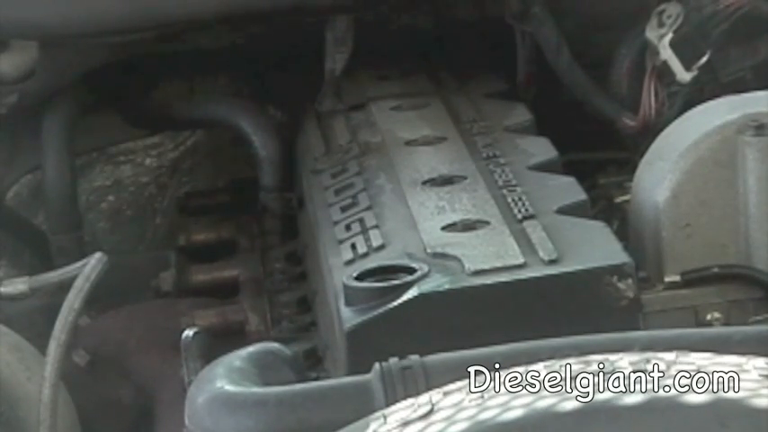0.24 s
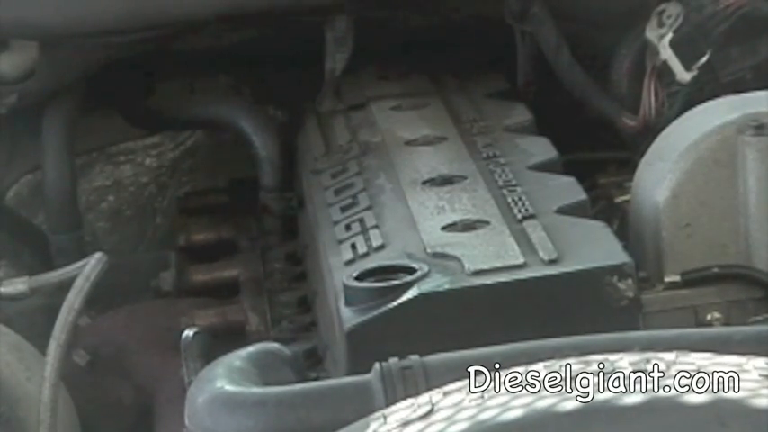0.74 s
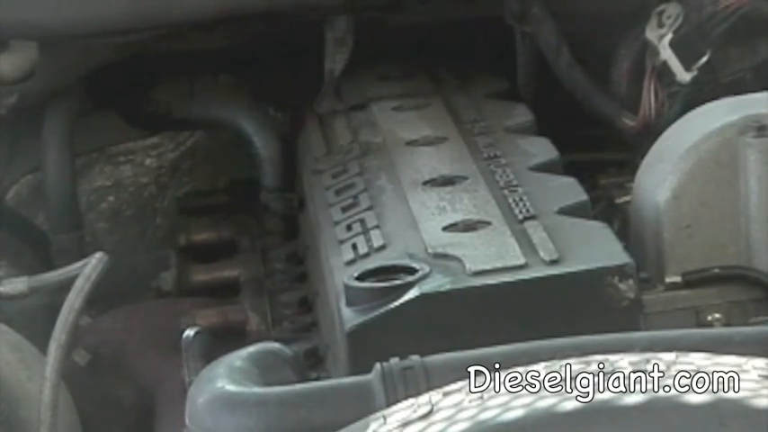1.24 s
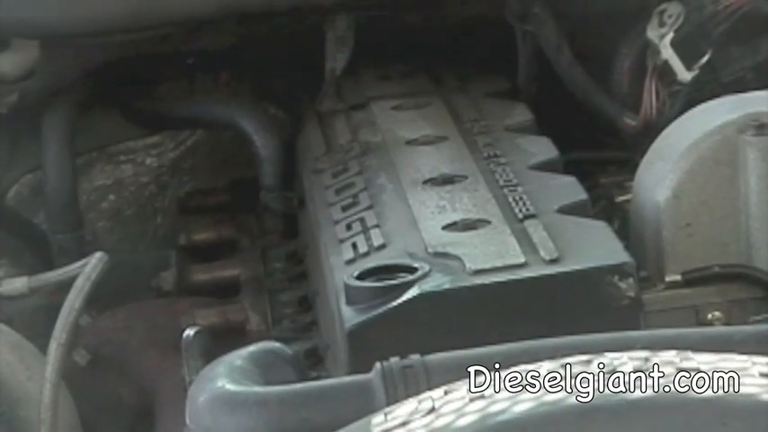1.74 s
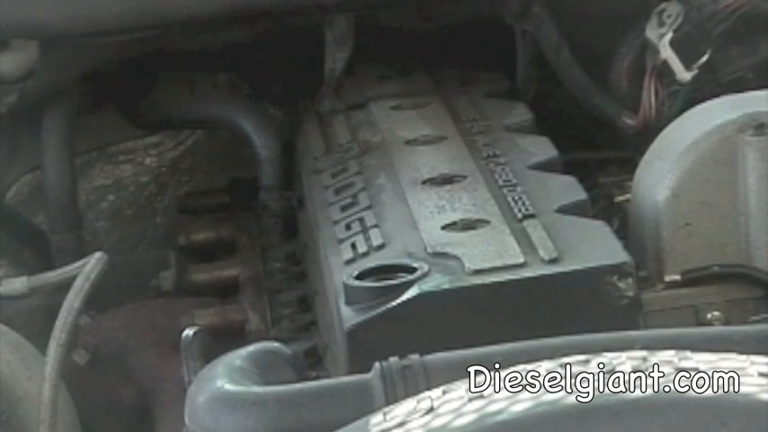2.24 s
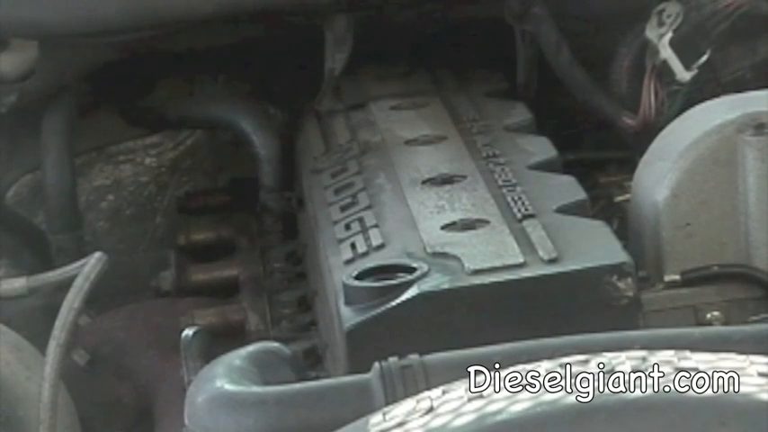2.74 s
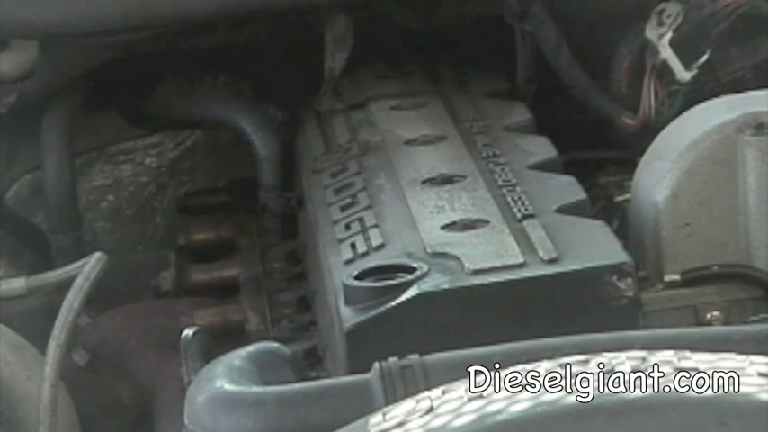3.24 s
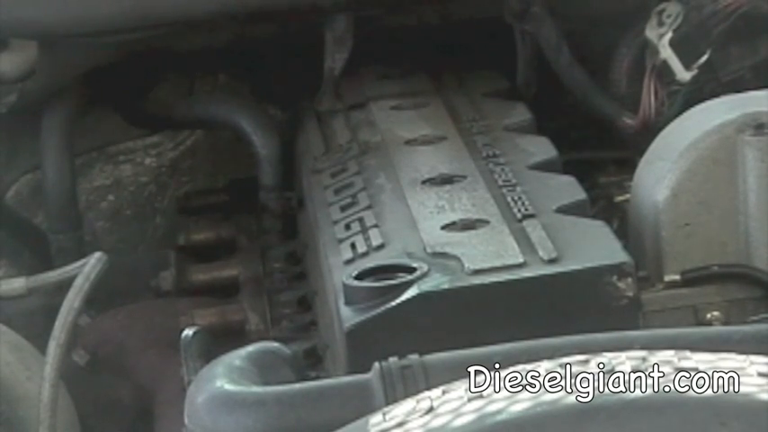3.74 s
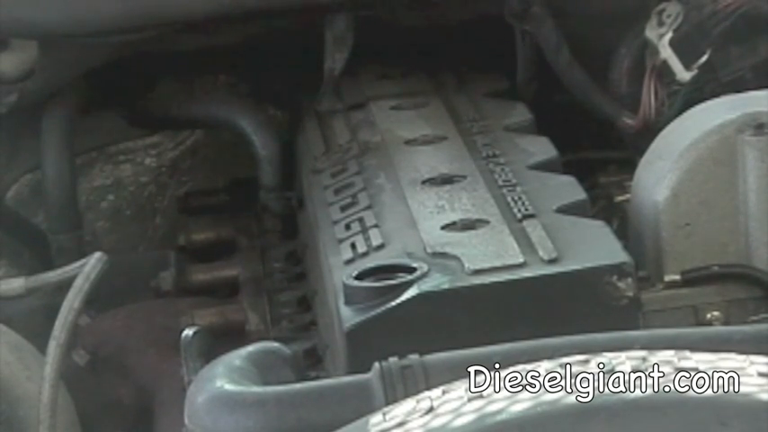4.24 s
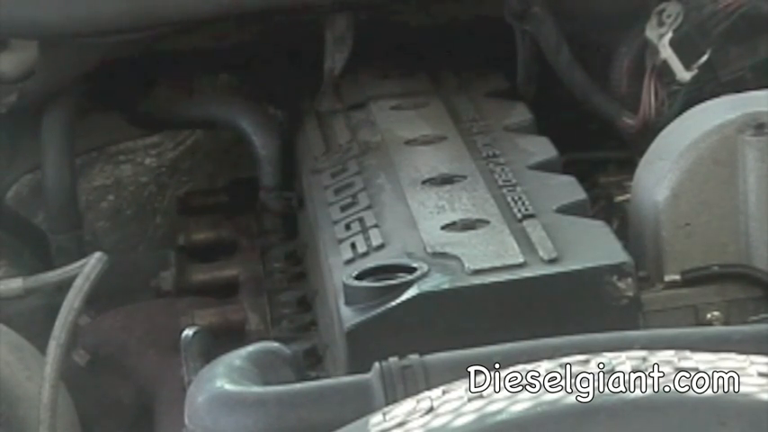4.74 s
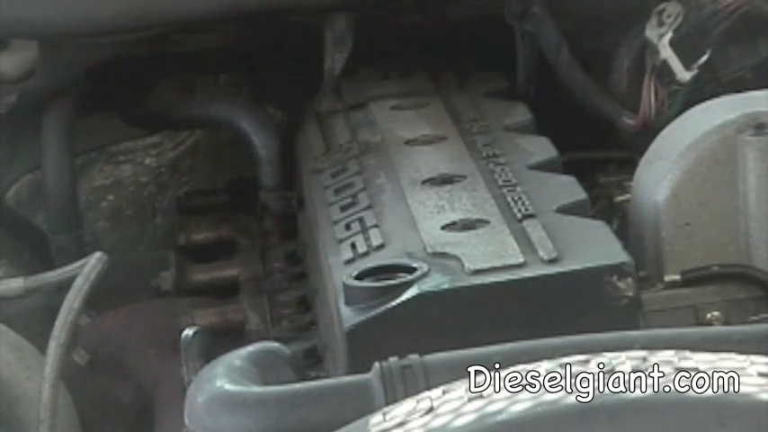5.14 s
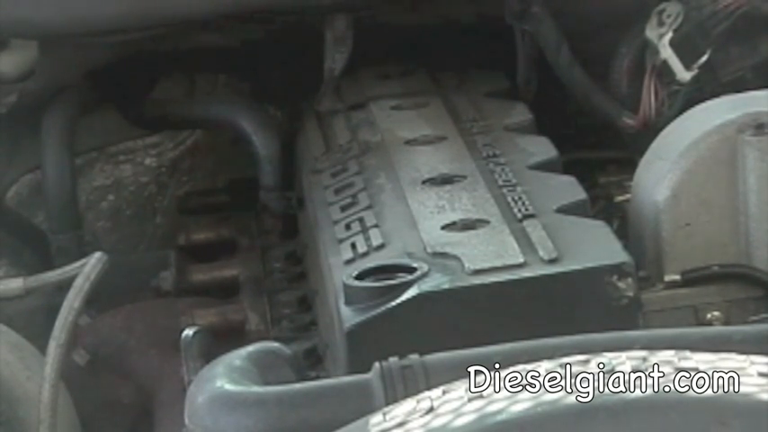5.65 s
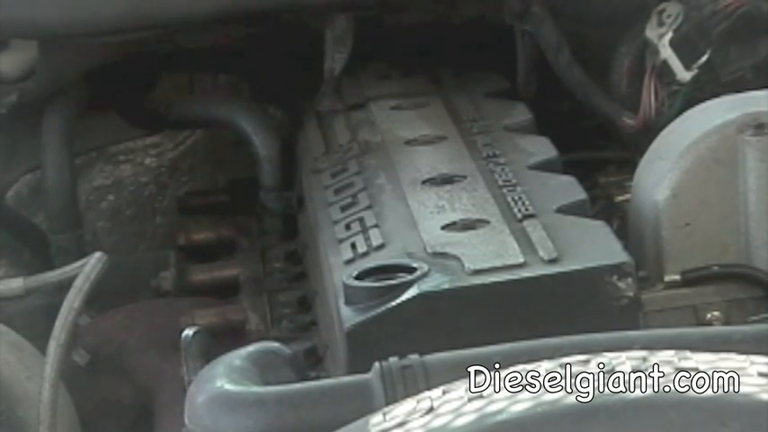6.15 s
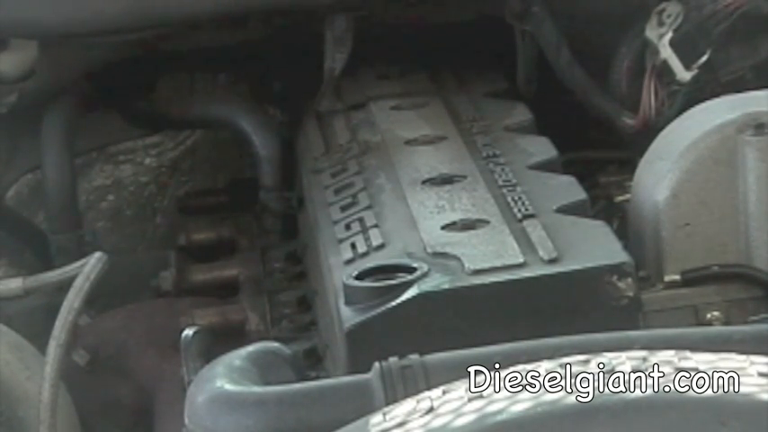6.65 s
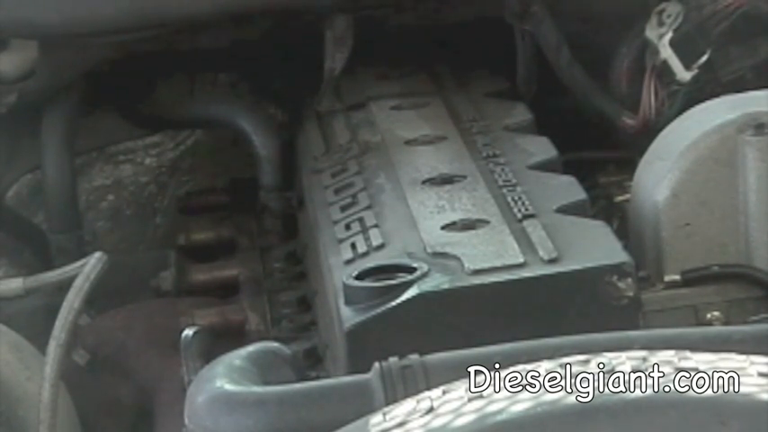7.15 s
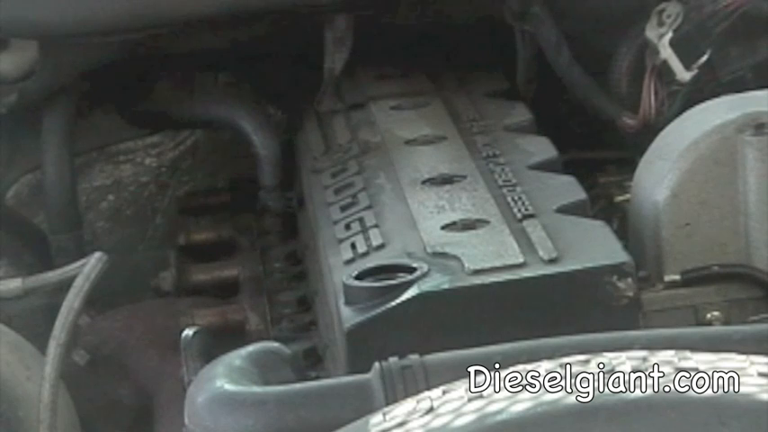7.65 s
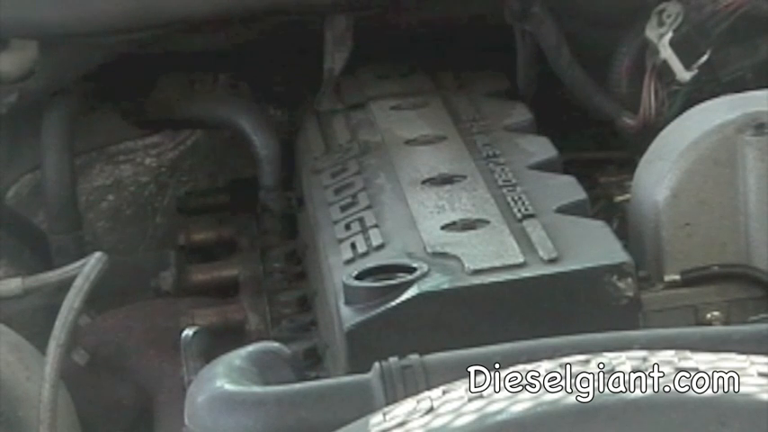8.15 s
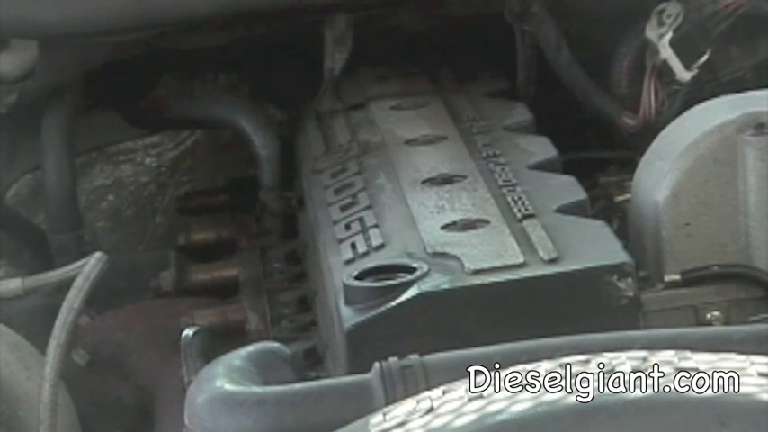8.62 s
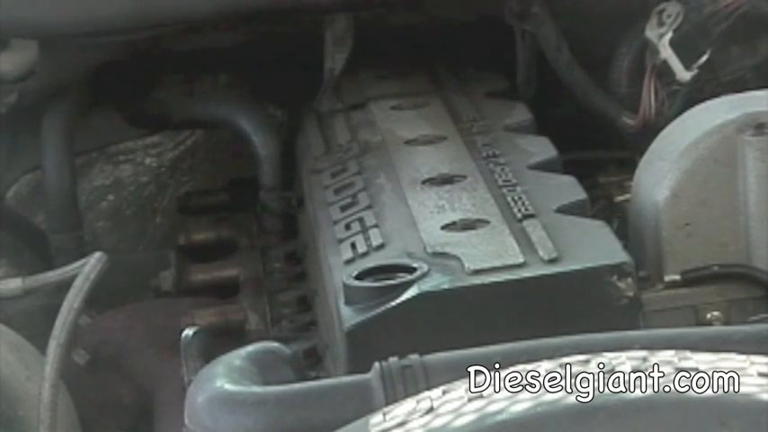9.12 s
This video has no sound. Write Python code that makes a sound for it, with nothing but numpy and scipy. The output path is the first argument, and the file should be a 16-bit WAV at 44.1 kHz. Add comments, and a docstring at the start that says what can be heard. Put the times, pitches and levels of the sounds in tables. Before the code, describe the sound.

Close up, a starter clunks and screeches, and a large diesel engine catches and settles into an even, rattling idle.

```python
"""A six-cylinder turbo diesel starts and idles under the open hood of a parked truck, heard close up.
After a few soft clicks the starter slams in and screeches for half a second; the engine catches,
revs up briefly and settles. Every firing knocks, slaps and rings the metal block, and each cylinder
knocks with its own strength. Injectors rattle, valves tap, the exhaust hums, the fan drones and
the belt chirps once a turn. A faint outdoor rumble lies behind it all."""
import sys
import numpy as np
from scipy import signal
from scipy.fft import rfft, irfft, next_fast_len
from scipy.io import wavfile
from scipy.ndimage import uniform_filter1d, minimum_filter1d, map_coordinates

SR = 44100
rng = np.random.default_rng(int(sys.argv[2]) if len(sys.argv) > 2 else 0)


def wrap_up_sound(samples):
    """Save the sound to the file named by the first command line argument, as 16-bit audio."""
    columns = np.atleast_2d(samples).T
    # keep every value between -1 and 1, then stretch to whole-number steps
    tamed = np.clip(columns, -1, 1)
    steps = np.round(tamed * 32767).astype(np.int16)
    wavfile.write(sys.argv[1], SR, steps)


N = 413658
CATCH_S = 1.3  # when the engine starts to run

# how fast the engine runs: (time [s], speed [firings/s])
ENGINE_SPEED = [(1.3, 25.21), (1.5, 55.31), (1.68, 55.48), (1.9, 44.95), (2.3, 39.81), (3.2, 40.33),
                (3.9, 39.83), (5.2, 40.13), (7.5, 40.06), (8.8, 40.51)]
# hard at first, soft while the fuel is cut back, then idle: (time [s], blows [dB], rattle [dB])
FUEL = [(1.38, -1, -4), (1.52, -3, -5.5), (1.85, -7.5, -4), (2.2, -1, -1.5), (3.8, 0, 0.4),
        (5.7, -0.5, 1.5), (9.3, -0.2, .2)]
# the cylinders in firing order: (knock [dB], injector [dB], valve tap [dB])
CYLINDERS = [(0, 0.5, 1), (1.5, 0.4, 0.5), (-4, -0.9, -1.5), (2, 0, 2), (-3, 0.4, 1.5), (2.5, 0.3, -0.5)]
# ringing of the block and covers, plus two faint peaks at the fan's drone pitches (580 and 730 Hz):
# (pitch [Hz], width [Hz], boost [dB])
ENGINE_PEAKS = [(193, 50, 5.5), (234, 77, 4.5), (580, 16, 1), (730, 29, 2.5), (805.6, 27, 10.5),
                (976, 89, 6.5), (1134, 98, 9.5), (1325, 131, 9.5), (1420, 62, 10.5), (1619, 130, 8),
                (1834, 17, 7.5), (1937, 92, 7.5), (2202, 69, 6), (2402, 380, 3.5), (2832, 67, 4),
                (3444, 16, 8.5)]
# the knock of burning fuel and its rebound: (crank position [firings], level [dB])
KNOCKS = [(-.21, 0), (-.04, -2.5)]
# tone of a knock, that is, its balance of low and high: (frequency [Hz], level [dB])
KNOCK_TONE = [(60, -48), (160, -27), (300, -12.5), (600, -4), (1000, -1), (1150, -0.5), (1450, -5),
              (1750, -8), (2700, -13.5), (4000, -28.5), (6000, -29), (14000, -38)]
# lighter slaps of gears and pistons: (crank position [firings], level [dB])
SLAPS = [(-.12, -.5), (.13, -1), (.26, -.5), (.44, -.5), (.63, -3)]
# tone of a slap: (frequency [Hz], level [dB])
SLAP_TONE = [(60, -35.5), (160, -11), (300, -6), (600, 1), (1000, -1.5), (1450, -9.5), (1750, -11.5),
             (2700, -15.5), (4000, -21), (14000, -39.5)]
# tone of the injector rattle: (frequency [Hz], level [dB])
RATTLE_TONE = [(300, -41), (900, -2), (1700, 4), (2700, 8), (4000, 3), (6000, -2), (8200, -7), (10000, -3),
               (13000, -7), (14300, -15.5)]
# a firm and a faint valve tap: (crank position [firings], level [dB])
TAPS = [(-.19, 0), (.41, -6.5)]
# tone of a valve tap: (frequency [Hz], level [dB])
TAP_TONE = [(2500, -23), (4000, -26), (4700, -8), (4950, 0.5), (5150, -3.5), (5450, -15), (6300, -24),
            (6800, -9.5), (7800, -21), (14000, -53)]
# tone of the fan's low roar: (frequency [Hz], level [dB])
ROAR_TONE = [(20, -27), (55, -14.5), (105, -3), (150, -7), (200, -3), (300, -0.5), (550, 3.5), (1000, -6),
             (2500, -13.5), (8000, -58)]
# the fan slows as its clutch lets go: (time [s], blade rate [Hz], level [dB])
FAN_RUN = [(1.3, 84, -22), (2.2, 83.7, -3), (4.1, 83.2, -2.5), (5.9, 81.3, 2.5), (6.7, 79.5, 1.5),
           (7.3, 75.3, 1.5), (8.1, 72, 0), (8.6, 70, -20)]
# notes of the fan blades: (pitch [times the blade rate], level [dB])
FAN_NOTES = [(3, -37.5), (5, -38), (7, -32.5), (9, -31.5)]
# hum of the exhaust and crankcase: (pitch [times the firing rate], level [dB])
HUM_NOTES = [(1, -55), (2, -39.5), (3, -48), (5, -47), (6, -40.5)]
# squeezing air in a cylinder loads the starter: (time [s], gear boost [dB], motor boost [dB])
COMPRESSIONS = [(.93, 8.5, -1), (1.1, 6, -2), (1.245, 5.5, -1), (1.42, 6, 5)]
# tone of the starter's gears: (frequency [Hz], level [dB])
GEAR_TONE = [(60, -34), (180, -39), (330, -12), (600, -6), (850, 3), (1200, -4.5), (1600, -3), (2100, -9.5),
             (4000, -15.5), (8000, -30), (10500, -21), (14000, -35)]
# growl and brush hiss of the starter motor: (frequency [Hz], level [dB])
MOTOR_TONE = [(40, -21), (160, -25), (215, -4), (238, 21.5), (265, 1), (400, 3), (2000, 5), (6000, -4),
              (10000, -2.5), (14000, -13)]
# starter screeches: (time [s], length [s], first pitch [Hz], last pitch [Hz], level [dB])
SCREECHES = [(.935, 0.06, 848, 815, -12.5), (.983, 0.023, 830, 823, -5), (0.948, 0.044, 3230, 3170, -30),
             (1.027, .07, 4400, 4030, -35), (1.03, .067, 3170, 3180, -33), (1.051, 0.066, 1040, 920, -9.5),
             (1.09, .053, 954, 880, -16), (1.094, 0.064, 1437, 1285, -14.5), (1.205, 0.029, 1280, 1090, -7)]
# the starter slamming in, then the first firings: (time [s], level [dB], fade [s], treble [dB])
CLUNKS = [(.848, -9, 0.16, 11), (1.32, 3, 0.032, -4), (1.361, -2.5, 0.045, 2), (1.388, -2, 0.034, -9),
          (1.476, -13, 0.027, -8)]
# tone of a clunk: (frequency [Hz], level [dB])
CLUNK_TONE = [(60, -30), (230, -14), (500, 3), (900, -14), (1250, 8.5), (1600, 5), (2100, -12), (2900, -9),
              (4500, -15.5), (8000, -14.5), (11000, -17), (14000, -22)]
# ringing of the metal that the clunks strike: (pitch [Hz], width [Hz], boost [dB])
HOUSING_RINGS = [(800, 35, 9), (1370, 98, 6.5), (1550, 86, 8.5), (2510, 50, 4), (2810, 110, 11),
                 (3550, 58, 5), (6100, 300, 1)]
# soft clicks before the start: (time [s], level [dB], fade [s], treble [dB])
CLICKS = [(.303, -24.5, 0.22, -4.5), (.714, -46, 0.11, 14.5), (.826, -36, 0.085, 9)]
# tone of a click: (frequency [Hz], level [dB])
CLICK_TONE = [(60, -17), (230, -2), (350, 5), (530, -6), (750, -5), (1400, 0.5), (2100, -10), (3000, -15),
              (4500, -14), (8000, -25), (14000, -23)]
# tone of the outdoor rumble: (frequency [Hz], level [dB])
OUTDOOR_TONE = [(15, -55), (25, -22), (127, -3), (141, -15), (170, -1), (189, -8.5), (247, -5), (290, -11),
                (432, -8), (594, -18), (1320, -24.5), (1920, -31.5), (3440, -38.5), (4380, -38),
                (9000, -40), (14500, -44)]
# faint steady whines in the background: (pitch [Hz], width [Hz], boost [dB])
WHINES = [(1490, 32, 12), (2830, 220, 9), (4425, 140, 12)]
# stereo width; mid is what both ears share, side is how they differ: (frequency [Hz], side gain [dB])
STEREO_WIDTH = [(60, -31), (100, -33), (180, -57), (310, -38.5), (540, -21), (940, -16.5), (1640, -13),
                (2840, -9.5), (4930, -13), (8560, -3.5), (14900, -8.5)]
# the treble leans slightly to the right: (frequency [Hz], left minus right [dB])
STEREO_LEAN = [(250, 0), (700, -0.1), (2500, -0.9), (5500, -.3), (13000, -.8)]


def engine():
    """The running engine: the turning crank times the blows, and more fuel makes them harder."""
    position = crank()
    fuel_db, rattle_db = curves(FUEL)
    knock_db, injector_db, tap_db = np.transpose(CYLINDERS)
    knocks = blows(position, KNOCKS, knock_db, KNOCK_TONE, ENGINE_PEAKS,
                   fade_s=0.039, alike=0.55, scatter_db=0.74, jitter_s=.00007)
    slaps = blows(position, SLAPS, np.zeros(len(CYLINDERS)), SLAP_TONE, ENGINE_PEAKS,
                  fade_s=0.033, alike=0.45, scatter_db=1.14, jitter_s=.00007)
    pair = amp(-17 + fuel_db) * knocks + amp(-18.5 + fuel_db) * slaps
    pair += amp(-22 + rattle_db) * injectors(position, injector_db)
    pair += valves(position, tap_db) + fan_roar()
    pair[0] += exhaust_hum(position) * ramp(1.35, 0.092) + belt(position) + fan_drone()  # mid only
    return pair * ramp(CATCH_S, 0.045)


def crank(start=-.88):
    """How far the engine's shaft has turned, counted in firings."""
    speed, = curves(ENGINE_SPEED)
    return start + np.cumsum(speed * (clock() >= CATCH_S)) / SR


def blows(position, pattern, cylinder_db, tone, rings, fade_s, alike, scatter_db, jitter_s):
    """Each cylinder's blows take their own paths through the metal, so they sound partly alike each time."""
    repeated, fresh = np.zeros((2, N)), np.zeros((2, N))
    for cylinder, own_db in enumerate(cylinder_db):
        firings = np.arange(cylinder, position[-1], len(CYLINDERS))
        for place, db in pattern:
            path = unit(shaped(burst(fade_s, rise_s=.0005, count=2500), tone, rings))
            for time in np.interp(firings + place, position, clock()):
                late, hard = rng.standard_normal(2)
                force = amp(db + own_db + scatter_db * hard)
                add(repeated, time + jitter_s * late, force * path)
                add(fresh, time, force * burst(fade_s, rise_s=.0005, count=1300))
    return np.sqrt(alike) * unit(repeated) + np.sqrt(1 - alike) * unit(shaped(fresh, tone, rings))


def injectors(position, cylinder_db, lead_firings=.37, depth_db=7, scatter_db=1.32):
    """The fuel pump and injectors give a grainy rattle that starts just ahead of every firing."""
    cycle = position + lead_firings
    firing = np.floor(cycle).astype(int)
    strength_db = cylinder_db[firing % len(CYLINDERS)] + scatter_db * rng.standard_normal(400)[firing]
    dip = np.interp(cycle % 1, [0, .13, .33, 1], [1, 0, 0, 1])  # the rattle rises, holds, then fades
    level = amp(strength_db - depth_db * dip + 0.1 * wobble(rate_hz=900))
    return unit(shaped(level * noise(), RATTLE_TONE, ENGINE_PEAKS))


def valves(position, cylinder_db, full_db=-28.5, harden_s=3.1, waver_db=1.1):
    """The valves make high, ringing, uneven taps that start soft and harden as the engine runs."""
    softer_db = 22.5 * np.exp(-(clock() - CATCH_S) / harden_s)
    taps = blows(position, TAPS, cylinder_db, TAP_TONE, rings=(),
                 fade_s=0.066, alike=0.38, scatter_db=3.0, jitter_s=.00005)
    return amp(full_db - softer_db + waver_db * wobble(rate_hz=7)) * taps


def fan_roar(full_db=-19.5, waver_db=0.9):
    """The fan and moving parts stir up a low roar that swells after the engine revs."""
    softer_db = 11.5 * (1 - ramp(1.59, 0.27))
    level = amp(full_db - softer_db + waver_db * wobble(rate_hz=3.14))
    return level * unit(shaped(noise(), ROAR_TONE, ENGINE_PEAKS))


def fan_drone(waver_db=2.0):
    """The fan blades sing faint notes that sink together as the fan slows."""
    blade_hz, fan_db = curves(FAN_RUN)
    phase = 2 * np.pi * np.cumsum(blade_hz) / SR
    track = np.zeros(N)
    for multiple, db in FAN_NOTES:
        track += amp(fan_db + db + waver_db * wobble(rate_hz=5)) * np.sin(multiple * phase)
    return np.sqrt(2) * track


def exhaust_hum(position, waver_db=1.0, rev_db=0.5):
    """Low notes follow the firing rate, a little louder at speed; the higher ones waver more."""
    speed, = curves(ENGINE_SPEED)
    push_db = rev_db * (speed - speed[-1]) / (speed.max() - speed[-1])
    track = np.zeros(N)
    for multiple, db in HUM_NOTES:
        level = amp(db + push_db + waver_db * np.sqrt(multiple) * wobble(rate_hz=7))
        track += level * np.sin(2 * np.pi * (multiple * position + rng.random()))
    return np.sqrt(2) * track


def belt(position, firings_per_turn=11.2145, chirp_hz=8250, level_db=-31, scatter_db=3):
    """One spot on the belt chirps each time it comes round."""
    track = np.zeros(N)
    progress, shape = swell(length_s=0.012)
    chirp_positions = np.arange(15.27, position[-1], firings_per_turn)
    for time in np.interp(chirp_positions, position, clock()):
        sharp, hard = rng.standard_normal(2)
        pitch_hz = chirp_hz + 90 * sharp + 150 * progress
        phase = 2 * np.pi * np.cumsum(pitch_hz) / SR
        add(track, time, amp(level_db + scatter_db * hard) * shape * np.sin(phase))
    return track


def starter(on_s=.842, off_s=1.446, rough_db=1.0, load_s=0.045):
    """The starter motor growls and its gear teeth grind, harder against each compression."""
    running = ramp(on_s, 0.017) * (1 - ramp(off_s, .05))
    times, gear_db, motor_db = np.transpose(COMPRESSIONS)
    load = np.exp(-((clock() - times[:, None]) / load_s) ** 2)  # one bump per compression
    teeth = amp(rough_db * wobble(rate_hz=300)) * noise()
    gears = amp(-20.7 + gear_db @ load) * unit(shaped(teeth, GEAR_TONE, ENGINE_PEAKS))
    motor = amp(-30 + motor_db @ load) * unit(shaped(noise(), MOTOR_TONE))
    return running * (gears + motor)


def screeches(waver_hz=36, chatter_db=1.0, octave_db=-22):
    """The starter drive slips in short, chattering screeches that mostly sag in pitch."""
    pair = np.zeros((2, N))
    for time, length_s, first_hz, last_hz, db in SCREECHES:
        progress, shape = swell(length_s)
        glide_hz = first_hz + (last_hz - first_hz) * progress
        pitch_hz = glide_hz + waver_hz * wobble(rate_hz=240, count=len(shape))
        phase = 2 * np.pi * np.cumsum(pitch_hz) / SR
        chatter = amp(db + chatter_db * wobble(rate_hz=200, count=len(shape)))
        note = np.sin(phase) + amp(octave_db) * np.sin(2 * phase)
        add(pair[0], time, np.sqrt(2) * chatter * shape * note)
    return pair


def strikes(rows, tone, rings, treble_life, split_hz=2500):
    """Single clicks or clunks: a bright crack that dies sooner than the low body."""
    pair = np.zeros((2, N))
    low, high = (signal.butter(2, split_hz, kind, fs=SR, output="sos") for kind in ("low", "high"))
    for time, db, fade_s, treble_db in rows:
        body = signal.sosfilt(low, burst(fade_s, rise_s=0.0025, count=12000))
        crack = signal.sosfilt(high, burst(fade_s * treble_life, rise_s=0.0023, count=12000))
        add(pair, time, amp(db) * shaped(body + amp(treble_db) * crack, tone, rings))
    return pair


def hollow_ring(start_s=.714, pitch_hz=530, level_db=-39, length_s=0.042):
    """The second click leaves a short hollow ring."""
    pair = np.zeros((2, N))
    progress, shape = swell(length_s)
    add(pair[0], start_s, amp(level_db) * shape * np.sin(2 * np.pi * pitch_hz * length_s * progress))
    return pair


def outdoors(level_db=-44.0):
    """A steady, distant rumble with faint whines in it."""
    return amp(level_db) * unit(shaped(noise(), OUTDOOR_TONE, WHINES))


def amp(db):
    """Turn decibels into a number to multiply by."""
    return 10 ** (np.asarray(db) / 20)


def unit(x):
    """Scale to an average power of 1 (a mid and side pair goes by its mid)."""
    return x / np.sqrt(np.mean(np.atleast_2d(x)[0] ** 2) + 1e-20)


def clock():
    """The time of every sample, in seconds."""
    return np.arange(N) / SR


def ramp(start_s, length_s):
    """Rise from 0 to 1 and stay there."""
    return np.clip((clock() - start_s) / length_s, 0, 1)


def along(points, hz):
    """Read between (frequency, value) points, with octaves evenly spaced."""
    frequencies, values = np.transpose(points)
    return np.interp(np.log(hz + 1), np.log(frequencies), values)


def curves(rows):
    """One value per sample for each column after the time."""
    times, *columns = np.transpose(rows)
    return [np.interp(clock(), times, column) for column in columns]


def wobble(rate_hz, count=N):
    """A smooth curve through rate_hz random points a second."""
    points = rng.standard_normal(int(count * rate_hz / SR) + 4)
    return map_coordinates(points, [np.arange(count) * rate_hz / SR])


def noise(count=N):
    """Plain hiss, as a mid and side pair."""
    return rng.standard_normal((2, count))


def burst(fade_s, rise_s, count):
    """Noise that rises quickly, then dies away by 60 dB in fade_s."""
    t = np.arange(count) / SR
    return noise(count) * np.exp(-np.log(1000) * t / fade_s) * (1 - np.exp(-t / rise_s))


def swell(length_s):
    """Progress from 0 to 1 through a short sound, and its rounded rise and fall."""
    progress = np.linspace(0, 1, int(length_s * SR))
    return progress, np.sin(np.pi * progress)


def add(track, time_s, sound):
    """Mix a sound into a track at the given time."""
    start = int(np.clip(round(time_s * SR), 0, N))
    track[..., start:start + sound.shape[-1]] += sound[..., :N - start]


def shaped(x, tone, rings=()):
    """Give a sound a tone and make it ring at certain pitches."""
    size = 2 * next_fast_len(x.shape[-1] // 2 + 4096)
    hz = np.fft.rfftfreq(size, 1 / SR)
    ring_db = sum(boost / (1 + (2 * (hz - pitch) / width) ** 2) for pitch, width, boost in rings)
    gain = unit(amp(along(tone, hz) + ring_db))
    # fold the filter so that it rings after a blow, never before (minimum phase)
    folded = irfft(np.log(gain))
    folded[1:size // 2] *= 2
    folded[size // 2 + 1:] = 0
    return irfft(rfft(x, size) * np.exp(rfft(folded)))[..., :x.shape[-1]]


def filtered(x, gain):
    """Turn each frequency up or down by gain(hz)."""
    size = next_fast_len(N + SR // 2)
    return irfft(rfft(x, size) * gain(np.fft.rfftfreq(size, 1 / SR)), size)[..., :N]


def scene():
    """Mix all the sources: the bass is central, the treble scatters around the engine bay."""
    clicks = strikes(CLICKS, CLICK_TONE, rings=(), treble_life=0.61)
    clunks = strikes(CLUNKS, CLUNK_TONE, HOUSING_RINGS, treble_life=0.84)
    mid, side = engine() + starter() + screeches() + clunks + clicks + hollow_ring() + outdoors()
    side = filtered(side, lambda hz: amp(along(STEREO_WIDTH, hz)))
    left_right = np.array([mid + side, mid - side])
    return filtered(left_right, lambda hz: amp(np.outer([.5, -.5], along(STEREO_LEAN, hz))))


def record(dry):
    """A limiter turns down the loudest peaks, and the very highest treble is cut off."""
    ceiling, top_hz = .97, 14650
    needed = np.minimum(1, ceiling / (np.abs(dry).max(axis=0) + 1e-9))
    gain = uniform_filter1d(minimum_filter1d(needed, size=121), size=121)
    return filtered(dry * gain, lambda hz: np.clip((top_hz - hz) / 400 + .5, 0, 1))


dry = scene()
out = record(dry)
wrap_up_sound(out)
```